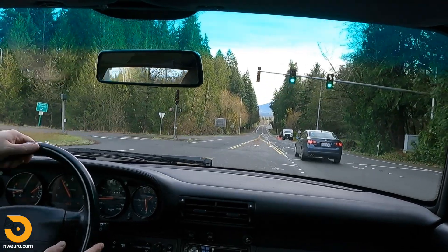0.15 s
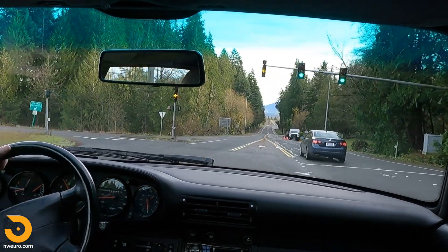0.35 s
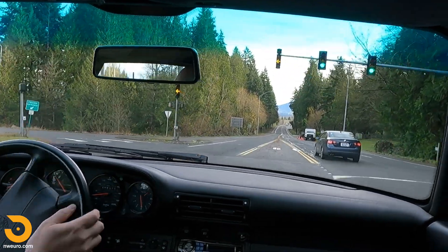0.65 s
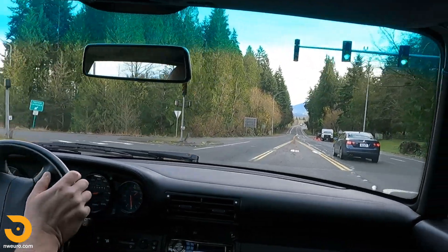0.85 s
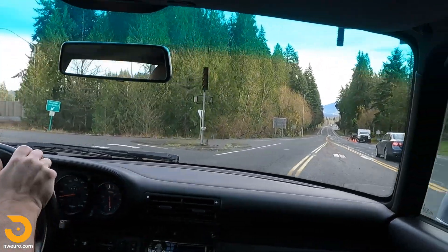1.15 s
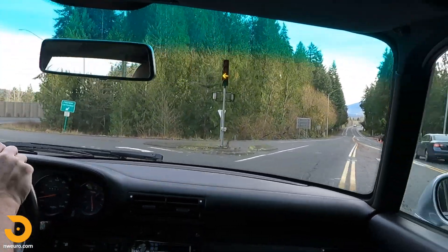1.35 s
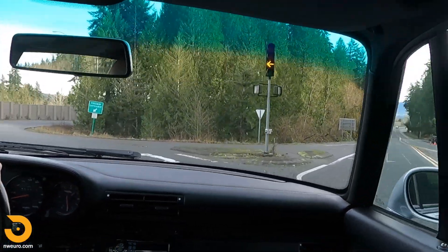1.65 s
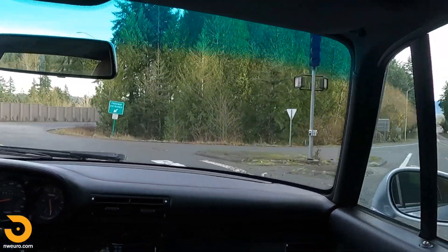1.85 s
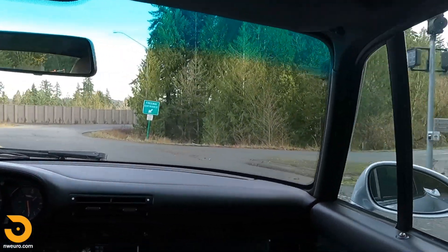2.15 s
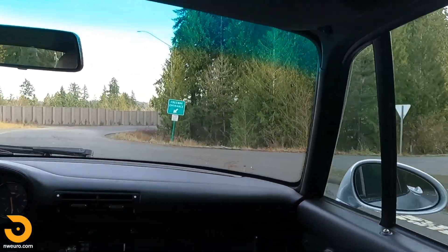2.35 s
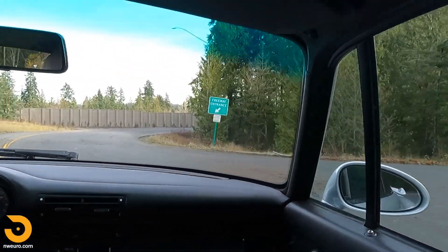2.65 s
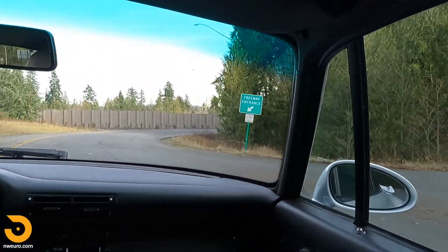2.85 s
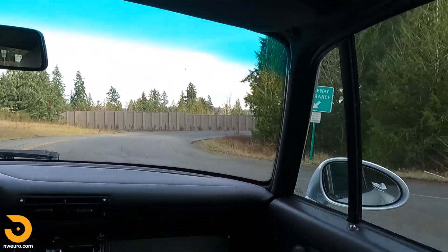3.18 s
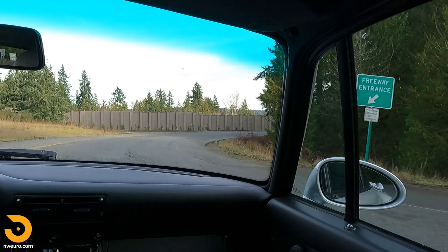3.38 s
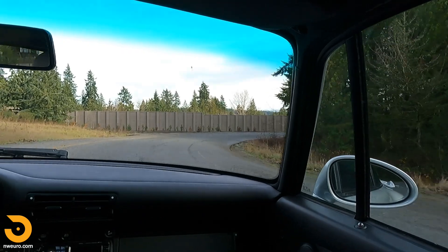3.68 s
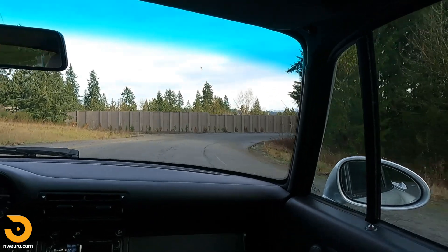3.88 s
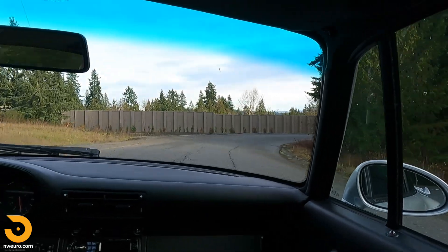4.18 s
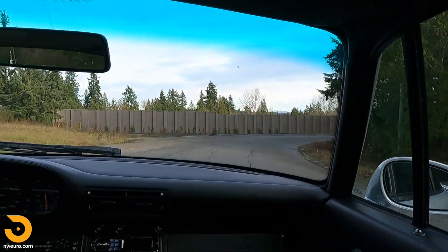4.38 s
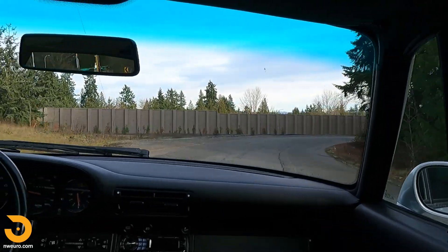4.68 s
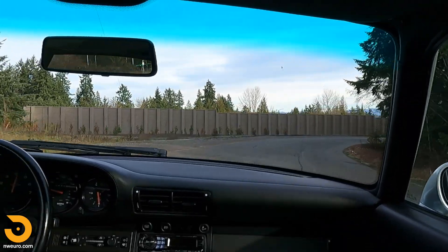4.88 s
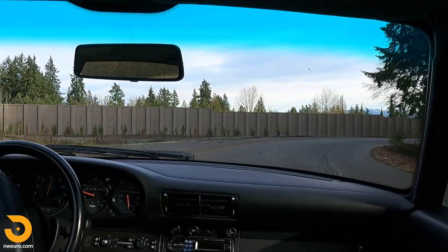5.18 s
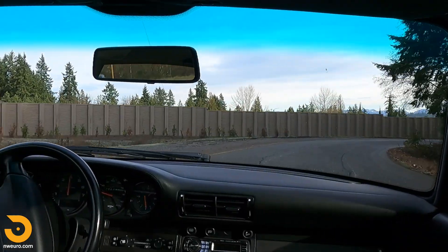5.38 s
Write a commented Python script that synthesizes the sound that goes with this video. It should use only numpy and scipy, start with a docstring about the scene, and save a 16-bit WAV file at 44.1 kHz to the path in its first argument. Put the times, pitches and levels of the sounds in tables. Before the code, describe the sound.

Inside a sports car turning left onto a ramp, the engine sags, then pulls hard and eases, with indicator ticks, clicks and road rumble.

```python
"""Inside a flat-six sports car taking a left turn onto a ramp: the engine sags, then pulls, then eases off.
Engine orders and belt-driven fan tones sweep with the crankshaft and boom as they cross resonances.
Coloured noise makes the road rumble and the mechanical rush around them.
The indicator relay ticks, its stalk clicks as the wheel turns and snaps back, trim knocks, and hands
slide on the rim: short noise envelopes, with damped modes under the clicks and knocks."""
import sys
import numpy as np
from scipy import signal
from scipy.fft import rfft, irfft, next_fast_len
from scipy.io import wavfile

SR = 44100
rng = np.random.default_rng(int(sys.argv[2]) if len(sys.argv) > 2 else 0)


def file_out(sig):
    """Save sig as 16-bit WAV at sys.argv[1]."""
    # one column per channel
    cols = np.atleast_2d(sig).T
    # limit, then scale
    lim = np.clip(cols, -1, 1)
    pcm = np.round(lim * 32767).astype(np.int16)
    wavfile.write(sys.argv[1], SR, pcm)


N = 243873
TIME = np.arange(N) / SR

# Crankshaft speed. Each row: time in seconds, speed in turns per second.
CRANK_SPEED = [(0.0, 49.91), (0.45, 46.65), (0.6, 45.84), (1.2, 44.18), (1.55, 44.0), (1.8, 44.9),
               (1.93, 44.3), (2.2, 45.65), (2.7, 49.1), (3.3, 53.99), (3.75, 58.67), (4.35, 66.17),
               (4.8, 70.86), (4.95, 71.8), (5.1, 71.16), (5.28, 69.59), (5.53, 63.67)]
# Low air modes of the cabin. Each row: centre in Hz, width in Hz, lift in dB.
AIR_MODES = [(163, 16, 3.5), (221.4, 12, 7.5)]
# Spectrum of small plastic ticks. Each row: frequency in Hz, relative density in dB per Hz.
TICK_SPECTRUM = [(2000, -22), (4200, -6), (5300, 1.5), (6500, -12), (8200, -20), (11200, -16.5),
                 (14000, -34.5)]


def amp(db):
    """Amplitude ratio of a level in decibels."""
    return 10 ** (np.asarray(db) / 20)


def unit(x):
    """Normalisation to rms 1, so that a later gain sets the level."""
    return x / np.sqrt(np.mean(x ** 2) + 1e-20)


def curve(rows, axis=1):
    """Linear interpolation of one column of a time table at every sample."""
    rows = np.asarray(rows)
    return np.interp(TIME, rows[:, 0], rows[:, axis])


def colour(x, points):
    """Linear filtering: the spectrum is multiplied by a gain drawn on a log-frequency axis."""
    hz, db = np.transpose(points)
    size = next_fast_len(len(x) + 2048)
    f = np.fft.rfftfreq(size, 1 / SR)
    gain = amp(np.interp(np.log(f + 1), np.log(hz), db))
    return irfft(rfft(x, size) * gain, size)[:len(x)]


def noise(points):
    """Coloured noise of rms 1: white noise shaped by a spectrum."""
    return unit(colour(rng.standard_normal(N), points))


def wander(count):
    """Band-limited random modulation of rms 1, with count new values a second."""
    knots = rng.standard_normal(6 * count + 4)
    fine = signal.resample(knots, 8 * len(knots))
    return unit(np.interp(TIME, np.arange(len(fine)) / (8 * count), fine))


def tone(turns, db):
    """Phase-driven sine of the given rms level: its phase is counted in turns."""
    return np.sqrt(2) * amp(db) * np.sin(2 * np.pi * (turns + rng.random()))


def in_mode(f, hz, width_hz):
    """Resonance curve: how far a tone is inside a mode, 0-1."""
    return 1 / (1 + (2 * (f - hz) / width_hz) ** 2)


def lift_db(order, modes):
    """Resonant lift that modes (Hz, width Hz, dB) give to a tone sweeping with the crankshaft."""
    f = order * curve(CRANK_SPEED)
    return sum(db * in_mode(f, hz, width_hz) for hz, width_hz, db in np.reshape(modes, (-1, 3)))


def cabin_db(order):
    """Transmission: the cabin's gain for a tone that sweeps with the crankshaft."""
    # How the cabin passes the upper orders. Each row: frequency in Hz, gain in dB.
    transmission = [(980, 1.5), (1080, -8), (1180, 1), (1300, -5.5), (1380, 4.5), (1550, -3.5),
                    (1730, -7.5), (2100, -14)]
    hz, db = np.transpose(transmission)
    return np.interp(order * curve(CRANK_SPEED), hz, db)


def unsteady(turns, order, db):
    """Cyclic variation: no two firings are alike, so higher orders scatter more in phase and strength."""
    scatter = min(order / 20, 1)
    phase = order * turns + .05 * scatter * wander(count=18)
    return tone(phase, db + 2.5 * scatter * wander(count=14))


def booms(turns, throttle, coast_flutter=0.12, pull_flutter=0.1):
    """Forced resonance: the strongest tones swell through modes, with slightly less flutter under load."""
    # Cycles per crank turn of the strongest tones; 4.692 is probably a belt-driven accessory.
    boom_orders = [2, 2.5, 3, 4, 4.5, 4.692, 5, 6, 7, 7.5, 9, 10.5, 12, 14, 20]
    # One row per order: coasting level in dB, full-throttle level in dB (both before lifts), then for
    # a lower and an upper mode: centre in Hz, width in Hz, lift in dB.
    boom_rows = [(-48, -35.5, 92, 4, 8.7, 140, 18, 6.5), (-59, -39, 130.5, 21, 18.8, 179, 22, 13.6),
                 (-47.5, -24.5, 132.3, 15.2, 12.6, 169.6, 26, 6.5), (-55, -35.5, 178, 6.4, 11, 270, 9.2, 7),
                 (-47, -35.5, 198, 54, 6.1, 254, 40, 11.6),
                 (-39.5, -43, 295.5, 26.7, 10.5, 329.3, 51, 16.2),
                 (-57, -50.5, 287, 23, 6.4, 351, 34, 16.5), (-43, -35, 280, 6.3, 10.6, 425, 39, 6.7),
                 (-59, -46.5, 430, 51, 9.8, 472, 56, 16.9), (-47.5, -46.5, 459, 81, 22.1, 535, 15, 7.8),
                 (-47.5, -48.5, 452, 110, 9.3, 552, 47, 7.8), (-58, -52, 476, 29, 16.3, 674, 110, 14),
                 (-66, -50, 584, 120, 12, 690, 43, 13), (-61.5, -45, 624, 74, 15.5, 784, 40, 6.2),
                 (-61, -56.5, 1154, 140, 16.3, 1386, 75, 6)]
    flutter = coast_flutter * (1 - throttle) + pull_flutter * throttle
    out = np.zeros(N)
    for order, (coast_db, pull_db, *modes) in zip(boom_orders, boom_rows):
        load_level_db = coast_db * (1 - throttle) + pull_db * throttle
        db = load_level_db + lift_db(order, modes) + lift_db(order, AIR_MODES)
        # higher orders flutter more
        out += tone(order * turns, db) * (1 + flutter * np.sqrt(order / boom_orders[0]) * wander(count=14))
    return out


def exhaust(turns, throttle, level_db=0.44, drift_db=2):
    """Fourier series of a two-turn cycle: unequal cylinders give half orders that growl in resonances."""
    # Weaker low orders. Each row: cycles per crank turn, then relative levels in dB coasting and at
    # full throttle.
    low_orders = [(1, -58.5, -44), (1.5, -49, -40.5), (3.5, -43.5, -39), (5.5, -42, -40)]
    # Upper half orders. Each row: cycles per crank turn, relative levels in dB coasting and at full
    # throttle, then one resonance: centre in Hz, width in Hz, lift in dB.
    growl_orders = [(6.5, -56.8, -40.1, 302.0, 11.0, 10.6), (8.0, -54.6, -48.6, 417.0, 57.0, 11.7),
                    (8.5, -47.1, -52.6, 451.0, 26.0, 9.6), (9.5, -51.1, -49.1, 463.0, 25.0, 11.8),
                    (10.0, -58.7, -48.1, 440.0, 90.0, 11.0), (11.0, -58.1, -58.0, 660.0, 80.0, 14.4),
                    (11.5, -61.3, -49.8, 691.0, 36.0, 8.0), (12.5, -60.3, -53.7, 575.0, 34.0, 11.5),
                    (13.0, -60.1, -53.0, 949.0, 117.0, 6.3), (13.5, -53.2, -53.7, 795.0, 48.0, 9.5),
                    (14.5, -61.8, -54.6, 1027.0, 22.0, 7.6), (15.0, -62.6, -53.6, 819.0, 102.0, 11.0),
                    (15.5, -62.3, -60.7, 825.0, 140.0, 9.5), (16.0, -62.7, -55.9, 934.0, 144.0, 6.6),
                    (16.5, -65.2, -51.3, 968.0, 29.0, 8.0), (17.0, -75.0, -54.6, 959.0, 48.0, 12.8),
                    (17.5, -69.0, -55.4, 852.0, 28.0, 10.6), (18.0, -63.1, -54.3, 966.0, 162.0, 9.1),
                    (19.0, -66.3, -60.3, 1353.0, 40.0, 11.3), (19.5, -65.0, -50.2, 886.0, 47.0, 7.5),
                    (20.5, -66.2, -58.0, 967.0, 47.0, 16.1), (21.0, -64.7, -58.0, 951.0, 32.0, 8.2)]
    out = np.zeros(N)
    for order, coast_db, pull_db, *mode in low_orders + growl_orders:
        order = np.round(2 * order) / 2
        load_level_db = coast_db * (1 - throttle) + pull_db * throttle
        db = load_level_db + lift_db(order, mode) + lift_db(order, AIR_MODES)
        out += unsteady(turns, order, db + level_db + drift_db * wander(count=8))
    return out


def rasp(turns, throttle, level_db=-65, load_db=10, slope_db=-1.4, drift_db=4.5):
    """Harmonic roll-off: a comb of high half orders fades upward and grows with load."""
    orders = np.arange(22, 32, .5)
    comb = np.zeros(N)
    for order in orders:
        db = slope_db * (order - orders[0]) + cabin_db(order) + drift_db * wander(count=6)
        comb += unsteady(turns, order, db)
    return comb * amp(level_db + load_db * throttle)


def fan(turns, throttle, blade_db=-60, blade_load_db=8, ring_hz=2790, ring_width_hz=260):
    """Blade-passing tone blurred by turbulence; its overtones sweep through a housing resonance."""
    # Level of the overtones' whine. Each row: time in seconds, level at the resonance's peak in dB.
    whine = [(0, -58.5), (.25, -57), (.45, -62), (.65, -63), (.8, -67), (2.5, -71), (4.55, -60),
             (4.75, -54), (4.87, -52.5), (4.94, -46), (5.01, -47), (5.07, -54), (5.15, -54), (5.22, -49.5),
             (5.3, -56), (5.53, -56)]
    # Shroud resonances under the blade tone. Each row: centre in Hz, width in Hz, lift in dB.
    shroud_modes = [(960, 42, 5.5), (1360, 70, 4.5)]
    blade_order = 19.37  # cycles per crank turn
    waver, haze = .5, .35  # depths of slow and fast turbulence
    out = np.zeros(N)
    for k in range(1, 4):
        if k == 1:
            level = amp(blade_db + blade_load_db * throttle + lift_db(blade_order, shroud_modes))
        else:
            detuning = (k * blade_order * curve(CRANK_SPEED) - ring_hz) / ring_width_hz
            level = amp(curve(whine)) / (1 + detuning ** 2)
        slow = wander(count=20) + 1j * wander(count=20)
        fast = wander(count=160) + 1j * wander(count=160)
        turbulence = 1 + waver * slow + haze * fast
        carrier = np.exp(2j * np.pi * k * blade_order * turns)
        out += level * unit((turbulence * carrier).real)
    return out


def rush(turns, throttle, rush_db=-39.5, rush_load_db=4, rush_octave_db=4,
         hiss_db=-52, hiss_load_db=4.5, hiss_octave_db=5, throb=0.13, lope=0.07):
    """Amplitude-modulated noise: gas and valve train pulse with the firings, growing with load and speed."""
    # Spectra of the body and the hiss. Each row: frequency in Hz, relative density in dB per Hz.
    body_spectrum = [(300, -18.5), (550, 7), (700, 2), (830, 0.5), (980, -0.5), (1150, -1.5), (1400, -6),
                     (1750, -8), (2100, -21.5), (3000, -28.5), (6000, -57)]
    hiss_spectrum = [(1000, -10.5), (2000, 3.5), (2800, 1.5), (3700, -2), (4600, -9), (5600, -12),
                     (7000, -19.5), (8200, -28), (10000, -31), (11200, -23), (12200, -40), (13500, -48)]
    # throb: six cycles per turn; lope: one cycle in two turns and three cycles per turn
    slow_pulse = np.cos(np.pi * turns) + np.cos(2 * np.pi * 3 * turns)
    pulse = unit(1 + throb * np.cos(2 * np.pi * 6 * turns) + lope * slow_pulse)
    octaves = np.log2(curve(CRANK_SPEED) / 60)  # relative to 60 turns per second
    body = noise(body_spectrum) * amp(rush_db + rush_load_db * throttle + rush_octave_db * octaves)
    hiss = noise(hiss_spectrum) * amp(hiss_db + hiss_load_db * throttle + hiss_octave_db * octaves)
    return pulse * (body + hiss)


def panels(throttle, load_db=4):
    """Noise-excited resonance: body panels ring at narrow fixed frequencies, more under load."""
    # Buzzing panels. Each row: centre in Hz, width in Hz, level in dB before the load term.
    panel_modes = [(456, 58, -42.5), (966, 40, -49.5), (1360, 41, -52), (1724, 29, -55.5),
                   (2777, 86, -58.5)]
    f = np.fft.rfftfreq(N, 1 / SR)
    ring = np.zeros(N)
    for hz, width_hz, db in panel_modes:
        spectrum = rfft(rng.standard_normal(N)) * in_mode(f, hz, width_hz)
        ring += amp(db) * unit(irfft(spectrum, N))
    return ring * amp(load_db * (throttle - 1.5))


def strike(s, db, decay, rise=0.00072, cabin_db=-17, cabin_decay=0.024):
    """Exponential decay: envelope of a small impact (times in s) and its short tail in the cabin."""
    t = np.maximum(TIME - s, 0)
    return amp(db) * (1 - np.exp(-t / rise)) * (np.exp(-t / decay) + amp(cabin_db) * np.exp(-t / cabin_decay))


def road(rumble_db=0, drone_db=-0.5, bump_decay=0.037, lump_db=0.47):
    """Random excitation: tyres shake the floor in lumps and thud over seams, and body panels drone."""
    # Each row: time in seconds, then relative levels in dB of the road rumble and the body drone.
    bed_levels = [(0, -49, -26), (.35, -41, -28.5), (.95, -44, -30), (1.2, -27.5, -26.5), (1.8, -31, -27),
                  (2.25, -28, -26.5), (2.95, -30, -30), (3.7, -39.5, -30.5), (4.25, -23.5, -23),
                  (4.55, -31.5, -25), (5.0, -29, -22.5), (5.53, -28, -30)]
    # Spectra of rumble and drone. Each row: frequency in Hz, relative density in dB per Hz.
    rumble_spectrum = [(15, -19.5), (30, -11.5), (48, -14.5), (70, -8), (100, 4), (130, 2), (170, -4.5),
                       (300, -34.5), (600, -81)]
    drone_spectrum = [(90, -22), (140, -6), (200, -1), (220, 6), (240, 3.5), (275, 1), (350, -8), (450, -3),
                      (540, -19), (700, -22.5), (1100, -49), (2500, -70.5)]
    # Wheels dropping over seams in the road. Each row: time in seconds, envelope level in dB.
    seams = [(1.981, -20), (2.131, -23), (2.177, -23.5), (2.199, -25), (2.276, -21.5), (2.378, -18.5),
             (4.24, -29)]
    thud = noise([(20, -14.0), (35, -14.0), (70, 7.0), (200, 6.0), (450, -3.0), (900, -18.0), (2500, -70.0)])
    thuds = thud * sum(strike(s, db, bump_decay, rise=0.0013) for s, db in seams)
    rumble = noise(rumble_spectrum) * amp(curve(bed_levels, axis=1) + rumble_db)
    drone = noise(drone_spectrum) * amp(curve(bed_levels, axis=2) + drone_db)
    return thuds + (rumble + drone) * unit(amp(lump_db * wander(count=18)))


def relay(pull_in_db=-39, drop_out_db=-50, fade_db=-1.8, decay=0.0027, count=5):
    """Periodic impacts: the relay pulls in once a blink and drops out about half way, ever fainter."""
    start_s, blink_s, drop_out_s = .2173, .7273, .384
    envelope = np.zeros(N)
    for k in range(count):
        tick_s = start_s + k * blink_s
        envelope += strike(tick_s, pull_in_db + k * fade_db, decay)
        if k < count - 1:
            envelope += strike(tick_s + drop_out_s, drop_out_db + k * fade_db, decay)
    return noise(TICK_SPECTRUM) * envelope


def hands(grain_db=2.5):
    """Stick-slip friction: hands slide on the rim as grainy noise under half-sine envelopes."""
    # Each row: start in seconds, length in seconds, envelope level in dB.
    slides = [(0.248, 0.061, -51), (0.383, 0.1, -55), (1.002, 0.08, -45), (1.017, 0.23, -51),
              (1.227, 0.092, -49.5), (2.01, 0.075, -53), (2.187, 0.042, -51), (2.352, 0.058, -50),
              (2.709, 0.025, -46.5)]
    # Spectrum of the slide. Each row: frequency in Hz, relative density in dB per Hz.
    slide_spectrum = [(800, -8), (2000, 4.5), (4000, -0.5), (6700, -8.5), (8500, -22), (11200, -18),
                      (14000, -31.5)]
    stick_slip = unit(amp(grain_db * wander(count=150)))
    envelope = np.zeros(N)
    for s, length, db in slides:
        envelope += amp(db) * np.sin(np.pi * np.clip((TIME - s) / length, 0, 1))
    return noise(slide_spectrum) * stick_slip * envelope


def ringing(modes, s, db, bright):
    """Modal superposition: one blow sets off damped modes, tilted by its brightness in dB per octave."""
    t = np.maximum(TIME - s, 0)
    live = (t > 0) & (t < .1)
    out = np.zeros(N)
    for k, (hz, mode_db, decay) in enumerate(modes):
        octaves = np.log2(hz / modes[0][0])
        size = (-1) ** k * amp(db + mode_db + bright * octaves)
        out[live] += size * np.exp(-t[live] / decay) * np.sin(2 * np.pi * hz * t[live])
    return out


def click(s, db, decay, bright, ring_db=-8.5, scrape_db=-0.5, grain_db=4):
    """Impact excitation: a catch snaps with a gritty scrape, and the column rings a little differently."""
    # Spectrum of the scrape before its tilt. Each row: frequency in Hz, relative density in dB per Hz.
    scrape_spectrum = [(500, -27), (1200, -1), (2400, 2.5), (3200, 3), (4200, 2), (5200, 0), (6700, -4),
                       (8200, -15), (11200, -8), (14000, -29)]
    # Column plastic. Each row: nominal frequency in Hz, nominal relative level in dB, decay in seconds.
    column_modes = [(1150, -7, .004), (1930, -8, .008), (2170, -9, .007), (2520, -3, .008),
                    (3120, -2, .005), (3690, -4, .006), (4340, -1, .007), (4820, -3, .007),
                    (5420, -4, .006), (7150, -8, .005)]
    grit = rng.standard_normal(N) * amp(grain_db * wander(count=1500))
    tilted = [(hz, level + bright * np.log2(hz)) for hz, level in scrape_spectrum]
    scrape = unit(colour(grit, tilted))
    modes = []
    for hz, mode_db, ring_s in column_modes:
        varied_hz = hz * (1 + .01 * rng.standard_normal())
        modes.append((varied_hz, mode_db + 2 * rng.standard_normal(), ring_s))
    return scrape * strike(s, db + scrape_db, decay) + ringing(modes, s, db + ring_db, bright)


def knock(s, db, bright, ring_db=-2.5, rattle_db=-4.5, rattle_decay=0.0045):
    """Impact excitation: a blow rings the trim's short modes, with a broad woody rattle."""
    # What the trim rings with. Each row: frequency in Hz, relative level in dB, decay in seconds.
    trim_modes = [(870, -6, .004), (950, -2, .005), (1120, -7, .006), (1374, -9, .006), (1550, -6, .004),
                  (1850, -11, .003), (2334, -19.5, .006), (2900, -21, .0038), (3660, -21.5, .004)]
    rattle = noise([(300, -14), (600, 13.0), (940, 9.5), (1200, 9), (1520, 11), (2300, -6), (3700, -12.5),
                    (5000, -36), (12000, -48.0)])
    return ringing(trim_modes, s, db + ring_db, bright) + rattle * strike(s, db + rattle_db, rattle_decay)


def loose_trim(tick_decay=0.0052):
    """Impulsive contact: loose trim ticks as short bursts of bright noise."""
    # Each row: time in seconds, envelope level in dB.
    trim_ticks = [(1.27, -48), (2.7403, -50.5), (2.9888, -48.5), (3.999, -48.5), (4.343, -54)]
    return noise(TICK_SPECTRUM) * sum(strike(s, db, tick_decay) for s, db in trim_ticks)


def controls():
    """Superposition of the relay, hands on the rim, column clicks, knocks and trim ticks."""
    # Steering-column clicks; the last run is the stalk snapping back and chattering. Each row: time in
    # seconds, nominal level in dB, scrape decay in seconds, brightness in dB per octave.
    column_clicks = [(.3708, -26.5, .0055, -1.5), (.378, -35, .004, -2), (.6682, -19.5, .003, -1.5),
                     (.671, -21, .0035, -1), (.6815, -35, .004, -1), (.7012, -28, .003, -3),
                     (1.6396, -26.5, .0048, -2.5), (1.672, -39, .004, -1), (3.412, -26.5, .0045, -5),
                     (3.4188, -30, .004, -4.5), (3.4248, -26, .0055, -1), (3.4295, -28, .006, -3.5),
                     (3.4435, -34, .007, -3), (3.4555, -40, .006, -2), (3.465, -40, .011, -3)]
    # Dull knocks of the wheel and trim. Each row: time in seconds, nominal level in dB, brightness of
    # the ringing in dB per octave.
    dull_knocks = [(.7012, -28.5, 9), (.708, -34, 5), (.867, -19.5, 0), (.8772, -29, 0), (1.3852, -16, -.5),
                   (1.3885, -24, 2), (1.396, -30, 3), (1.4005, -29, 2), (4.235, -30, 3), (4.252, -28, 3),
                   (5.4456, -39.5, 12)]
    clicks = sum(click(*row) for row in column_clicks)
    knocks = sum(knock(*row) for row in dull_knocks)
    return relay() + hands() + clicks + knocks + loose_trim()


def scene():
    """Phase locking: the engine and fan tones follow one slightly jittering crankshaft."""
    # Each row: time in seconds, throttle opening 0-1.
    throttle_rows = [(0, 0.57), (.45, 0.41), (1.1, 0.31), (1.6, 0.18), (2.3, 0.23), (2.8, 0), (3.25, 0.33),
                     (3.6, 0.73), (3.95, 0.99), (4.5, 0.9), (4.9, 0.96), (5.25, 0.64), (5.53, 0.5)]
    jitter = .003 * wander(count=30) + .005 * wander(count=8)  # turns
    turns = np.cumsum(curve(CRANK_SPEED)) / SR + jitter
    throttle = curve(throttle_rows)
    tones = booms(turns, throttle) + exhaust(turns, throttle) + rasp(turns, throttle) + fan(turns, throttle)
    engine = tones + rush(turns, throttle) + panels(throttle)
    return (engine + road() + controls())[None]


def record(dry):
    """Linear filtering: a narrow notch in the treble, then a low-pass band limit."""
    # Response with the notch. Each row: frequency in Hz, gain in dB.
    treble_response = [(20, 0), (8300, -0.5), (8800, -5), (9080, -20.5), (9400, -5), (10000, -5)]
    heard = colour(dry[0], treble_response)
    low_pass = signal.firwin(511, 14000, window=("kaiser", 9), fs=SR)  # cutoff in Hz
    return signal.oaconvolve(heard, low_pass, "same")[None]


dry = scene()
out = record(dry)
file_out(out)
```